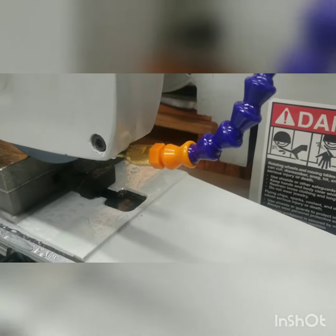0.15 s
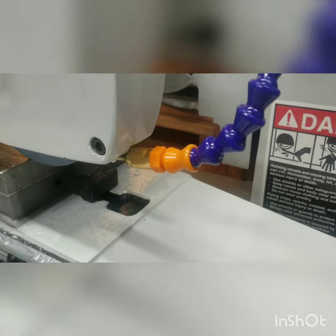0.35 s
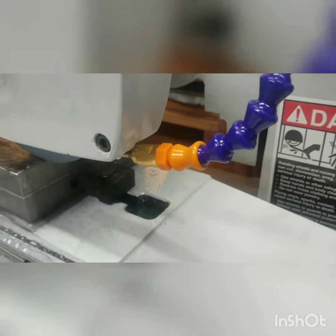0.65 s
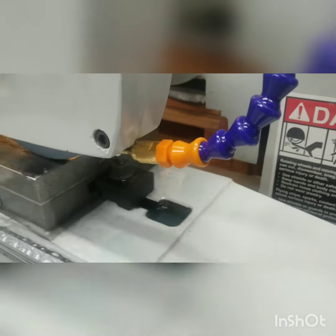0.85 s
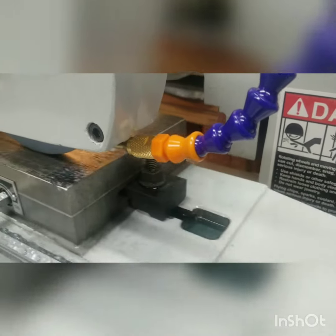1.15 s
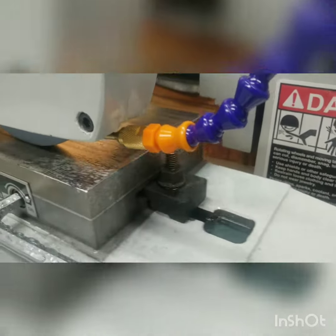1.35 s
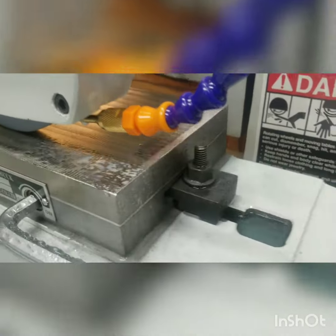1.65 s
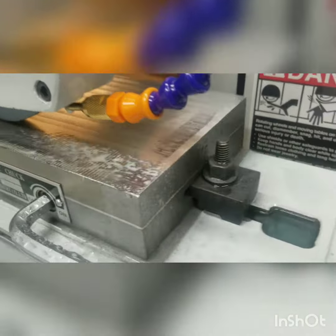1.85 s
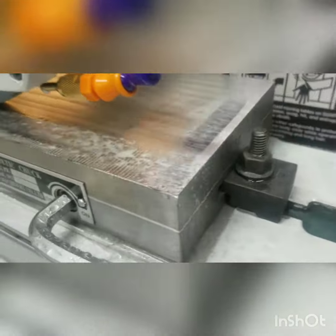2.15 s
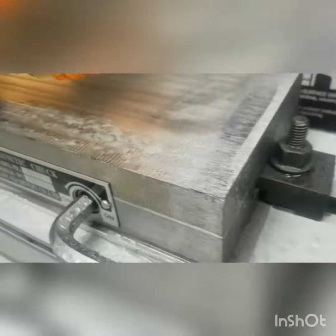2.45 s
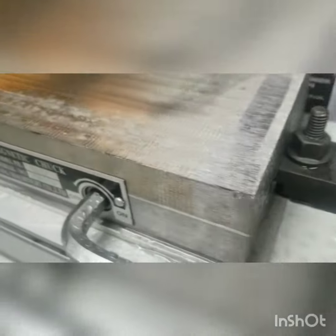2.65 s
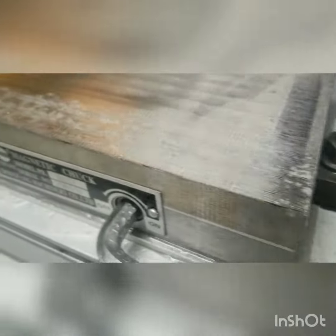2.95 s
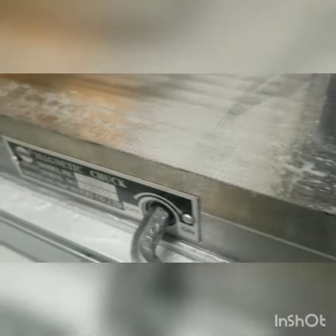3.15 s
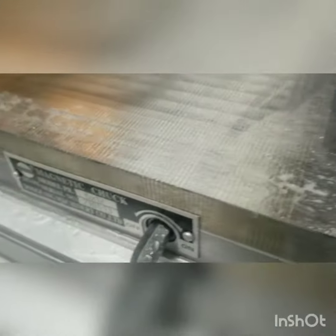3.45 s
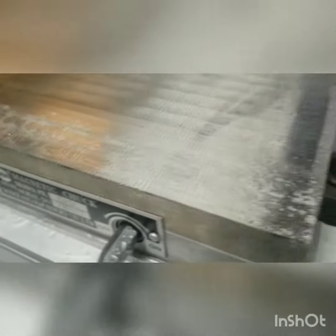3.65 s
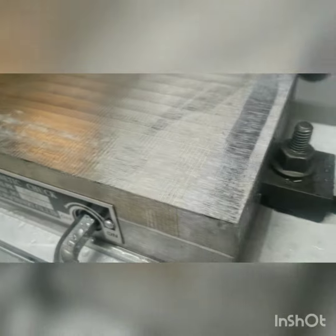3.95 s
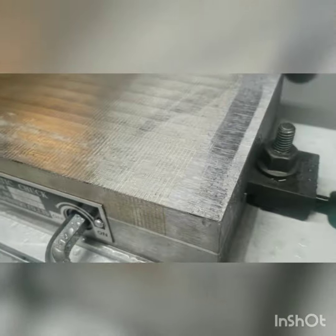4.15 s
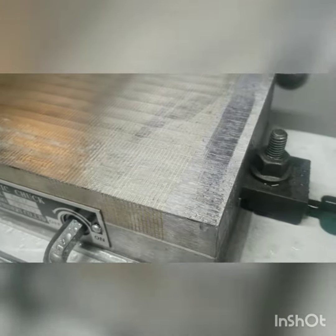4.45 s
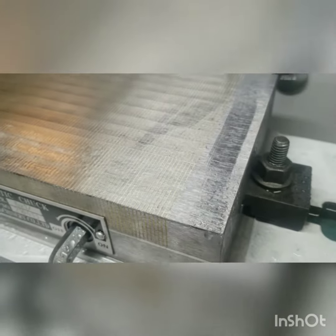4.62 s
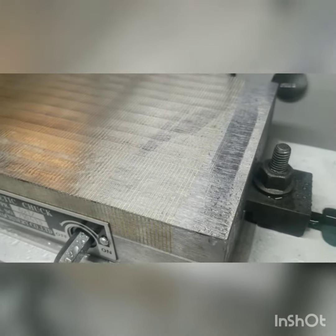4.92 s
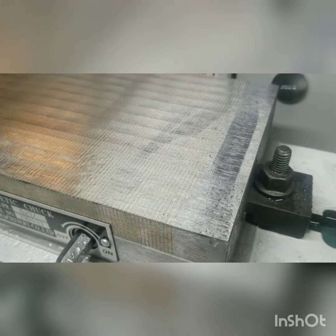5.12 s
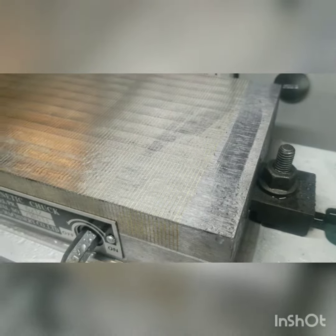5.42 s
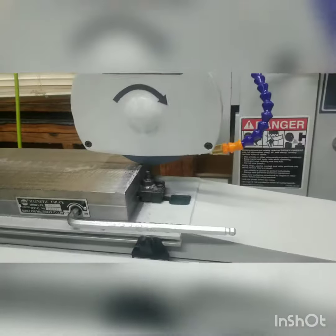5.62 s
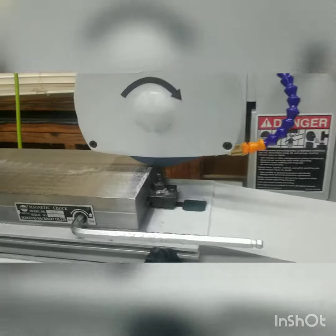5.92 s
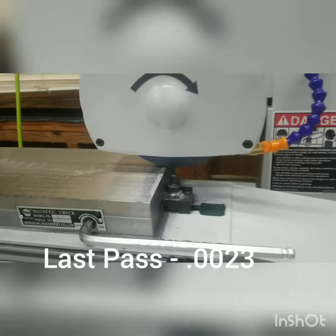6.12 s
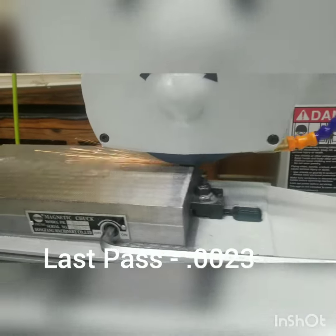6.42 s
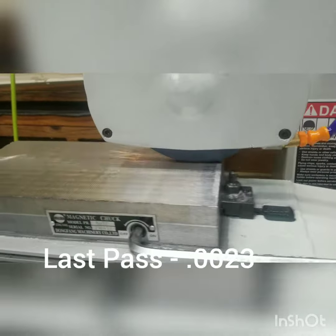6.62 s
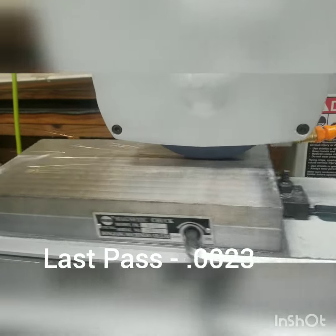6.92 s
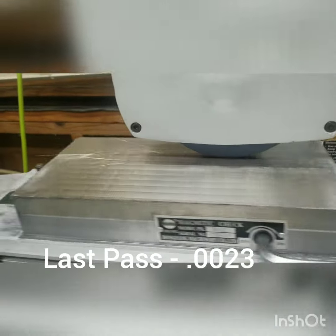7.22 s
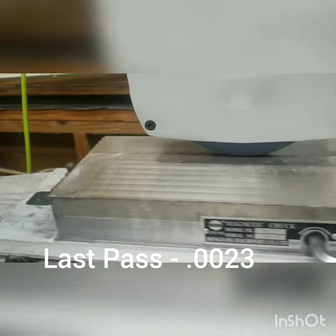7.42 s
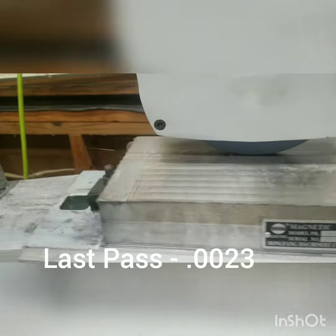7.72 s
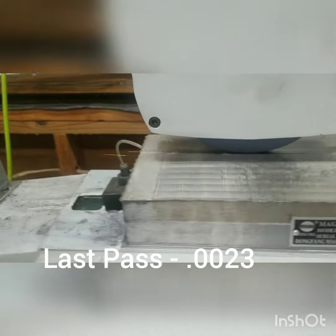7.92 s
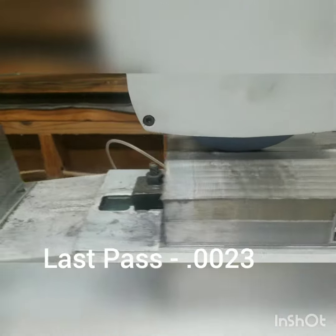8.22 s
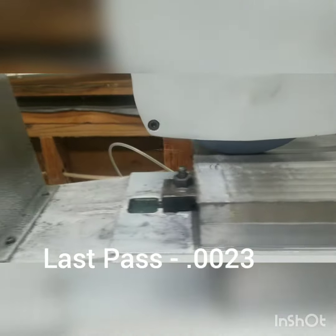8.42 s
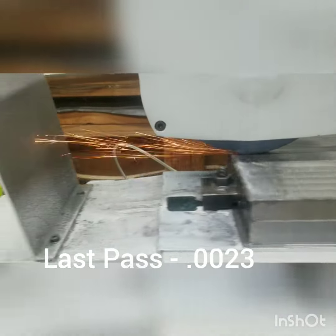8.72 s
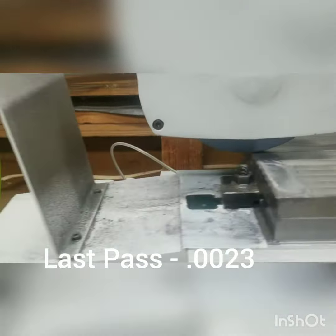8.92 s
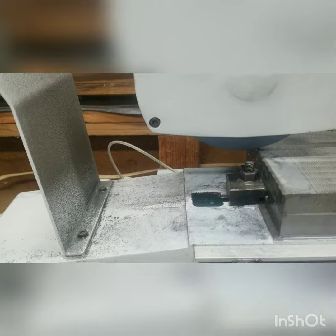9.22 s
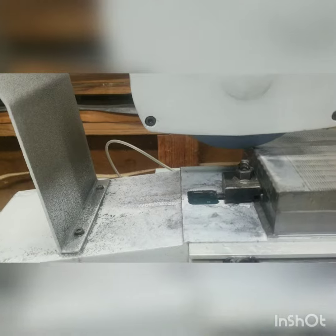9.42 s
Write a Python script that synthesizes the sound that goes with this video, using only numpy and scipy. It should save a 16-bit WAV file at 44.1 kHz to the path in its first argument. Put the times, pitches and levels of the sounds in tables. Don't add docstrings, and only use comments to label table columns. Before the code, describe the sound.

A surface grinder's spindle hums and sings while an air jet hisses loudly; the wheel grinds steel twice, separated by an abrupt cut and tiny gap.

```python
import sys
import numpy as np
from scipy import signal
from scipy.fft import rfft, irfft
from scipy.io import wavfile
from scipy.ndimage import uniform_filter1d

SR = 44100
rng = np.random.default_rng(int(sys.argv[2]) if len(sys.argv) > 2 else 0)


def nominal_scale(level):
    x = np.asarray(level, float) / 20
    return 10 ** x


def dump(signal):
    limited = np.clip(np.atleast_2d(signal).T, -1, 1)
    pcm = np.round(limited * 32767).astype(np.int16)
    wavfile.write(sys.argv[1], SR, pcm)


N = 422037
SCENE_CHANGE_S = 5.446
TOUCH_S = .14


def unit(x):
    return x / np.sqrt(np.mean(x ** 2) + 1e-20)


def seconds():
    return np.arange(N) / SR


def by_scene(t, first, second):
    return np.where(t < SCENE_CHANGE_S, first, second)


def along(points, hz):
    f, v = np.transpose(points)
    return np.interp(np.log(hz + 1), np.log(f + 1), v)


def curve(points, t):
    s, value = np.transpose(points)
    return np.interp(t, s, value)


def wobble(rate):
    knots = rng.standard_normal(int(N * rate / SR) + 4)
    return np.interp(np.arange(N) * rate / SR, np.arange(len(knots)), knots)


def window(t, start, end, edge):
    return np.clip(np.minimum(t - start, end - t) / edge + .5, 0, 1)


def spell(start, end, db):
    t = seconds()
    outside_s = np.maximum(0, np.maximum(start - t, t - end))
    return db - 250 * outside_s


# touch t/s, leave t/s, slip at touch, slip at leave (turns/s)
PASSES = [
    (.68, 3.11, .52, .44),
    (6.41, 8.84, .84, .41),
]


def spindle():
    t = seconds()
    idle_turns = 59.22
    passes = [window(t, touch, leave, TOUCH_S) for touch, leave, _, _ in PASSES]
    slip = sum(on * np.interp(t, row[:2], row[2:]) for on, row in zip(passes, PASSES))
    return np.cumsum(idle_turns - slip) / SR, passes


STAGE_START = [
    0,
    .68,
    1.9,
    3.15,
    5.48,
    6.38,
    7.2,
    8,
    8.75,
]
# hum level/dB, roar level/dB, fizz against jet level/dB, shaft level/dB, bearing level/dB
STAGE_LEVELS = [(-35.5, -31.5, -5.5, 0, 2), (-36.5, -30.5, -3, 0.5, 1), (-35.5, -32, -6, -2.5, -1),
                (-36.5, -32.5, -9, 0.5, -2.5), (-37, -31.5, -1.5, -2, -1.5), (-39, -31, -2, 0.5, -0.5),
                (-37, -32.5, -4.5, 1.5, 1.5), (-37, -32, -2, 2.5, 3.5), (-35, -32, -8.5, 2, 5)]


def stages():
    index = np.searchsorted(STAGE_START, seconds(), side='right') - 1
    return uniform_filter1d(np.transpose(STAGE_LEVELS)[:, index].astype(float), size=SR // 8, axis=1)


# t/s, delay of the jet at the left port (samples)
HAND_TURN = [(0, -9), (1, -8), (2.5, -15.5), (4, -17.7), (5.47, -17.3), (5.49, -8), (6.2, -8), (6.8, 2),
             (7.2, 5), (8.3, 5.5), (8.8, 8), (9.6, 7.5)]


def jet_lag(t):
    return curve(HAND_TURN, t)


def body_lag(t):
    return .4 * jet_lag(t) + by_scene(t, -7.5, 1.5)


def ports(hz, lag, delay=0):
    return np.exp(-2j * np.pi * hz / SR * (delay + np.array([lag / 2, -lag / 2])[:, None]))


def body_path(hz, t):
    return ports(hz, body_lag(t))


# f/Hz, level/dB
LEFT_PORT = [(100, -1), (350, 1.5), (4000, 2), (10000, -0.5), (14000, 5.5)]
# f/Hz, level/dB
TURNED_PORT = [(300, -1), (2000, -1), (5000, -1.5), (12000, -4)]


def rush(spectrum, paths, diffuse_db, streak_db, shaded=False):
    frame = dict(nperseg=512, noverlap=384)
    hz, t, z = signal.stft(rng.standard_normal((3, N)), SR, **frame)
    field = rng.standard_normal(z[1:].shape)
    field = uniform_filter1d(field, size=2, axis=1)
    field = uniform_filter1d(field, size=160, axis=2)
    direct = z[0] * paths(hz[:, None], t)
    room = nominal_scale(diffuse_db) * z[1:]
    if shaded:
        room = room * np.minimum(lift(hz[:, None], t), 1)
    both = (direct + room) * nominal_scale(streak_db * unit(field))
    left_db = along(LEFT_PORT, hz)[:, None] + np.outer(along(TURNED_PORT, hz), t > SCENE_CHANGE_S)
    both[0] *= nominal_scale(left_db)
    both = both * nominal_scale(along(spectrum, hz))[:, None]
    return unit(signal.istft(both, SR, **frame)[1][:, :N])


def tones(orders, turns, levels_db, blur):
    lag_turns = body_lag(seconds()) * 59 / SR
    out = np.zeros((2, N))
    for order, db in zip(orders, levels_db):
        phase = 2 * np.pi * (order * turns + rng.random() + blur * wobble(30))
        for side, sign in enumerate((-1, 1)):
            level = nominal_scale(db + 2.5 + 1.3 * wobble(1.493))
            out[side] += level * np.sin(phase + sign * np.pi * order * lag_turns)
    return out


# f/Hz, level/dB (per Hz)
GRIP = [(25, -16), (60, 2), (110, 7), (180, -16), (300, -80)]


def grip():
    return nominal_scale(-48) * window(seconds(), 5.5, 5.78, TOUCH_S) * rush(GRIP, body_path, -10, streak_db=0)


# f/Hz, level/dB (per Hz)
HUM = [(25, -70), (60, -17), (120, -12), (170, -15.5), (220, 13), (300, -8), (400, -1.5), (520, -3.5),
       (700, -4), (1000, -8.5), (2000, -76)]


def housing_hum(hum_db, runout):
    return nominal_scale(hum_db - 2.5 + 1.4 * runout) * rush(HUM, body_path, -10, streak_db=3.0)


def roar_paths(hz, t):
    return body_path(hz, t) + .8 * ports(hz, by_scene(t, 26, -32), 70)


# f/Hz, level/dB (per Hz)
ROAR = [(500, -31), (900, -14), (1400, -8), (1800, -14), (2100, -3.5), (2500, -12.5), (2900, -5.5),
        (3300, -17), (4500, -17)]


def machine_roar(roar_db, hand, runout):
    return nominal_scale(roar_db - 1.5 + 0.41 * hand + 0.89 * runout) * rush(ROAR, roar_paths, -1, streak_db=4.3)


# t/s, whine f/Hz
FEED = [(0, 0), (.2, 0), (.8, 4100), (3.04, 4100), (3.48, 0), (3.98, 2003), (5.47, 2003), (5.49, 1200),
        (5.85, 0), (5.95, 0), (6.55, 4100), (8.78, 4100), (9.21, 0), (9.33, 0), (9.6, 1560)]
# f/Hz, level/dB
WHINE = [(250, -60), (600, -54), (1000, -46), (1650, -41), (1870, -42), (2003, -49), (2600, -40),
         (3000, -52), (4100, -75)]
# f/Hz, width f/Hz, level/dB
CARRIAGE = [(590, 90, 10), (750, 50, 0), (900, 50, -4), (1100, 300, -12), (1650, 80, 5), (1860, 60, 1),
            (2003, 60, -1), (2140, 200, 3), (2480, 260, 1)]


def table_drive():
    t = seconds()
    hz = curve(FEED, t)
    steady = np.clip((t - 3.98) / .35, 0, 1) * (t < 5.47)
    db = along(WHINE, hz) + by_scene(t, 0, -2) + 6 * steady
    db = db + 17 * window(t, 5.55, 5.8, TOUCH_S)
    db = db + 9 * window(t, 9.48, 9.7, TOUCH_S)
    braking = uniform_filter1d(1. * (np.gradient(hz) < 0), size=SR // 50)
    db = db - 9 * braking
    db = db - 12 * np.exp(-((t - 4.82) / .11) ** 2)
    flutter_db = 3 * wobble(40)
    level = nominal_scale(db + 3 + flutter_db * (1 - .4 * steady))
    swell = nominal_scale(-20) + sum(nominal_scale(g) / np.hypot(1, ((hz - c) / (w / 2)) ** 2) for c, w, g in CARRIAGE)
    octave = nominal_scale(np.interp(steady, (0, 1), (-20, -6)))
    phase = 2 * np.pi * np.cumsum(hz) / SR
    whine = level * (swell * np.sin(phase) + octave * np.sin(2 * phase))
    tail = rng.standard_normal((2, SR // 4)) * nominal_scale(-60 * np.arange(SR // 4) / SR / .25)
    tail = tail / np.linalg.norm(tail[0])
    return whine + nominal_scale(-4) * signal.fftconvolve(whine[None], tail, axes=1)[:, :N]


# start t/s, end t/s, from f/Hz, to f/Hz, level/dB
SWEEPS = [(0.195, .65, 6250, 6200, 0.5), (0.252, .8, 8600, 7650, -11), (.3, .8, 4550, 4540, 7),
          (.75, 1.2, 4240, 5700, -11), (.85, 1.25, 4900, 4960, -6), (1.1, 1.5, 5400, 5200, 7),
          (1.195, 1.9, 7150, 7500, -15), (1.3, 1.7, 6800, 6700, 6), (1.5, 2.3, 8300, 8800, -8),
          (1.7, 2.045, 5360, 5300, 6.5), (2.202, 2.6, 5850, 5100, -13), (2.302, 2.75, 7300, 7600, -8),
          (2.6, 3.7, 4540, 4460, -2), (3.303, 3.7, 9100, 10100, -6), (3.4, 3.9, 7900, 7600, -11),
          (3.6, 4.3, 5500, 5500, -2), (3.85, 4.55, 8600, 8500, -3), (4.6, 5.45, 7700, 7740, -3),
          (6.447, 6.996, 4370, 4360, -16), (6.4, 7, 3250, 3220, -11), (6.7, 7.05, 8700, 8600, -8),
          (7, 8.7, 5600, 5700, -11), (8.7, 9.2, 3300, 3300, -18), (8.95, 9.7, 4250, 4200, 3),
          (9.15, 9.7, 5340, 5300, 3), (5.5, 6.3, 8200, 8150, 5), (8.65, 9.2, 8300, 7900, -8),
          (9.25, 9.7, 8700, 8700, 11), (3.7, 5.45, 4400, 4400, -2.5), (0, .25, 7700, 7700, 4),
          (6.5, 7.4, 8000, 8000, 9), (3.9, 4.15, 5600, 5600, -5), (4.3, 4.7, 4800, 4740, 2)]


def sweeps(hz, t):
    total = 0
    for start, end, low, high, db in SWEEPS:
        centre = np.interp(t, (start, end), (low, high))
        shape = np.exp(-2 * ((hz / centre - 1) / 0.059) ** 4)
        total = total + db * window(t, start, end, 0.24) * shape
    return total


# start t/s, end t/s, centre f/Hz, width f/Hz, level/dB
POCKET = [(0, 0.41, 7230, 900, 9.5), (.65, 1.12, 6780, 800, 11), (-.2, 0.69, 4790, 496, -11),
          (1.3, 2.4, 3880, 497, 2.5), (2.1, 3.72, 6240, 980, 3.5), (2.2, 3, 4900, 700, -2.5),
          (3.21, 5.54, 5270, 800, 4), (5.5, 5.72, 3670, 1180, 11), (7.45, 10.3, 13300, 1480, 0),
          (8.45, 8.9, 4390, 1290, 6.5)]
MIRRORS = [(-0.2, 0.4, 10720, 700, 6.0), (-0.2, 0.6, 13700, 700, -5.5), (-0.2, 0.8, 9380, 1100, -5.5),
           (-0.2, 0.8, 15440, 450, 5.5), (-0.2, 2.4, 11720, 300, -4.0), (-0.2, 3.0, 4520, 300, 2.5),
           (0.2, 1.0, 4980, 300, -5.0), (0.2, 1.0, 6180, 300, -4.5), (0.6, 2.8, 7000, 300, -5.5),
           (0.8, 2.4, 5650, 450, 6.5), (1.0, 3.0, 14320, 1100, -4.0), (1.2, 3.4, 9300, 1600, 3.5),
           (1.2, 3.8, 15480, 300, 6.0), (1.2, 4.4, 7680, 300, 5.5), (1.6, 2.2, 14100, 1600, 3.0),
           (2.2, 3.0, 3060, 450, -4.5), (2.4, 3.0, 14900, 1600, -3.5), (2.6, 3.6, 11050, 300, -8.5),
           (2.6, 4.2, 6000, 700, -3.5), (2.8, 4.4, 3780, 300, -6.0), (3.0, 5.4, 13000, 300, -4.5),
           (3.2, 3.8, 14200, 450, 7.0), (3.2, 5.6, 11720, 450, 4.0), (3.4, 5.6, 4520, 300, -3.0),
           (4.4, 5.4, 5300, 700, 3.0), (4.4, 5.6, 14580, 700, 6.5), (5.4, 6.6, 5580, 300, 5.5),
           (5.4, 7.4, 12550, 300, 6.0), (5.6, 6.4, 4080, 700, 4.5), (5.8, 8.2, 6100, 450, -3.0),
           (6.2, 9.2, 13380, 300, 6.0), (6.4, 9.2, 11500, 300, 4.0), (6.6, 8.2, 14880, 450, -5.5),
           (7.0, 7.8, 10820, 450, -7.0), (7.8, 9.8, 4410, 450, 4.0), (7.8, 9.8, 9140, 450, 6.5),
           (8.0, 8.6, 12100, 300, -8.0), (8.8, 9.2, 14500, 1600, 6.5)]
SHADOW = [(.25, 1, 8200, 900, -6), (1.45, 2.3, 8300, 800, -4), (3.35, 3.85, 7900, 800, -6),
          (3.85, 4.55, 8500, 900, -9), (4.55, 5.47, 8100, 800, -8), (8.6, 9.3, 8100, 1000, -5)]


def lift(hz, t):
    start, end, centre, width, db = np.transpose(POCKET + MIRRORS + SHADOW)
    shape = db * np.exp(-2 * ((hz - centre) / width) ** 4)
    return nominal_scale(shape @ window(t, start[:, None], end[:, None], 0.24) + sweeps(hz, t))


def jet_paths(hz, t):
    lag = jet_lag(t)
    turned_away = np.max(lag[t < SCENE_CHANGE_S]) - lag
    delay = by_scene(t, 40, 46) + by_scene(t, 1.35, 0) * turned_away
    echo = by_scene(t, .47, .36) * ports(hz, lag + 10, delay)
    return lift(hz, t) * (ports(hz, lag) + echo)


# t/s, length t/s, level/dB
BITES = [
    (0.753, 0.053, 1.5),
    (0.897, 0.05, 2),
    (1.106, 0.03, 0.5),
    (1.84, 0.023, 0.5),
    (6.507, 0.075, 6),
]


def bites():
    t = seconds()
    swell = sum(db * np.exp(-((t - s) / length) ** 2) for s, length, db in BITES)
    return swell + 1.0 * wobble(22)


# t/s, jet level/dB
NEAR = [(0, -24), (.5, -19.5), (1.4, -26), (1.9, -23), (2.75, -19.5), (3.3, -21.5), (3.9, -21.5),
        (5.47, -24), (5.49, -32), (6.3, -29), (6.75, -27.5), (7.3, -21), (7.7, -22), (8.3, -26.5),
        (9.6, -27.5)]


def nozzle_level():
    return curve(NEAR, seconds())


# f/Hz, level/dB (per Hz)
JET = [(2000, -31), (2950, -32), (3150, 0.5), (3700, 0.5), (4300, 2.5), (5000, 9), (5600, -3), (6300, 4.5),
       (6900, 0), (7400, -9.5), (8000, -27), (9000, -54)]


def air_jet(bite_db, hand, pulse_db):
    db = nozzle_level() - 0.84 + bite_db + 1.13 * hand + pulse_db
    return nominal_scale(db) * rush(JET, jet_paths, -6.5, streak_db=2.2, shaded=True)


# f/Hz, level/dB (per Hz)
FIZZ = [(7000, -13), (8000, -9), (8600, -3), (9500, 2), (11000, 6), (13000, 5), (15000, 6.5), (15900, -2.5)]


def grit_fizz(fizz_db, bite_db, hand, pulse_db):
    db = nozzle_level() + fizz_db + 0.22 + 0.76 * bite_db + 0.78 * hand + pulse_db
    return nominal_scale(db) * rush(FIZZ, jet_paths, -6, streak_db=3.2, shaded=True)


# shaft order, level/dB
UNEVEN = [(3, -24), (6, -24), (12, -3.5), (25, -5.5), (45, -4), (66, 6.5), (90, 5), (115, -4.5),
          (132, -8.5)]


def unevenness(turns, cut):
    order = np.arange(513)
    draw = rng.standard_normal((2, 4, len(order)))
    patterns = irfft((draw[0] + 1j * draw[1]) * nominal_scale(along(UNEVEN, order)))
    read = np.array([np.interp(turns % 1, np.arange(1024) / 1024, p, period=1) for p in patterns])
    drift = 2 * np.pi * 0.141 * seconds()
    pair = np.cos(drift) * read[:2] + np.sin(drift) * read[2:]
    return nominal_scale(-31.0 + 0.46 * cut) * unit(pair + 0.024 * pair[::-1])


# shaft order, start t/s, end t/s, level/dB
HOUSING = [
    (19.94, 3.3, 5.47, -41),
    (20.1, 5.5, 6.4, -55),
]


def housing_song(turns):
    levels = [spell(start, end, db) for _, start, end, db in HOUSING]
    return tones([row[0] for row in HOUSING], turns, levels, blur=0.2)


SHAFT_ORDERS = [1, 2, 6, 7, 7.27, 8, 9, 20, 20.1, 21, 22]
# idle level/dB, first pass level/dB, second pass level/dB
SHAFT = [(-63, -61.5, -75), (-63.5, -63, -71), (-45.5, -45.5, -47), (-38, -39, -37.5), (-44.5, -50, -45),
         (-73, -52, -48.5), (-73, -52, -44.5), (-48, -53, -49), (-56, -67, -67), (-53.5, -48, -52),
         (-78, -48, -51)]


def shaft(turns, passes, stage_db):
    state = np.array([1 - passes[0] - passes[1], *passes])
    return tones(SHAFT_ORDERS, turns, np.array(SHAFT) @ state + stage_db, blur=0.11)


# first scene level/dB, second scene level/dB
BEARING_IDLE = [(-48, -55), (-40, -53), (-40, -45.5), (-48, -49), (-48, -50), (-46.5, -75), (-60, -46.5),
                (-54, -48), (-58, -49), (-37.5, -49), (-34.5, -38), (-50.5, -37.0), (-41, -36), (-62, -50),
                (-65, -47), (-53, -43), (-35.5, -42.5)]
# first pass fresh level/dB, worn level/dB, second pass fresh level/dB, worn level/dB
BEARING_CUT = [(-61, -43, -45, -53), (-58, -63, -53, -50.5), (-50, -44, -54, -63), (-34.5, -41, -44.5, -52),
               (-49, -44, -41.5, -46), (-53, -56, -41, -53), (-60, -45, -43, -43), (-37, -64, -39.5, -37),
               (-51, -53.5, -40, -40), (-40.5, -35.5, -38.0, -46.5), (-36, -53, -36.5, -41.5),
               (-36.5, -42, -26.5, -32), (-51.5, -53, -52, -42), (-60, -41, -37, -50),
               (-35, -30.5, -28, -45), (-42, -41, -27.5, -45), (-34.5, -33, -37, -38)]


def bearing_levels(passes):
    t = seconds()
    touches = [row[0] for row in PASSES]
    worn = [np.clip((t - s - late) / .9 + .5, 0, 1) for s, late in zip(touches, (1.25, 1.4))]
    build_db = -1 * sum(on * np.clip(1 - (t - s) / .5, 0, 1) for on, s in zip(passes, touches))
    free = (1 - passes[0] - passes[1]) * np.array([t < SCENE_CHANGE_S, t >= SCENE_CHANGE_S])
    cutting = [share * on for on, w in zip(passes, worn) for share in (1 - w, w)]
    return np.array(BEARING_IDLE) @ free + np.array(BEARING_CUT) @ np.array(cutting) + build_db - 2.1


# bearing tone number, start t/s, end t/s, level/dB
SPOTS = [(5, 2.3, 3.6, 11), (5, 6.4, 8.7, -6), (5, 8.85, 9.7, 10), (7, 0, .65, 5), (7, .75, 1.45, -5),
         (7, 1.9, 3.1, -5), (7, 6.4, 7, -9), (7, 8.05, 8.7, -5), (7, 9.1, 9.7, 4), (9, 0, .6, -5),
         (9, .7, 1.05, 6), (9, 1.1, 1.85, -8), (9, 1.85, 2.25, 7), (9, 7.05, 7.4, 7), (9, 8.3, 8.75, 4),
         (10, 1.1, 1.85, -4), (10, 1.9, 2.6, 6), (10, 2.7, 3.05, -5), (10, 3.65, 4.1, -6),
         (10, 5.9, 6.3, -8), (10, 6.7, 7.05, 3), (10, 8.3, 8.75, 4), (11, 0, 1.05, 5), (11, 1.5, 2.65, 4),
         (11, 3.15, 5.47, -10), (11, 5.5, 6.75, -10), (11, 8.85, 9.7, 6), (14, 1.45, 1.85, 5),
         (14, 2.7, 3.05, -6), (14, 3.6, 5.47, -9), (14, 8.85, 9.7, -7), (15, 1.45, 2.2, 5),
         (15, 6.4, 6.75, -4), (16, 0, 1.45, -5), (16, 2.65, 3.05, -8), (16, 4.15, 5.05, 9),
         (16, 6.4, 7.6, -5)]


def spots():
    t = seconds()
    out = np.zeros((len(BEARING_ORDERS), N))
    for line, start, end, db in SPOTS:
        out[int(line)] += db * window(t, start, end, TOUCH_S)
    return out


BEARING_ORDERS = [(4, 0), (7, -1), (7, 1), (8, -1), (9, -1), (9, 0), (9, 1), (10, 0), (10, 1), (11, 0),
                  (12, 0), (13, 0), (13, 1), (14, -3), (14, -2), (14, -1), (14, 0)]


def bearing(turns, passes, stage_db):
    balls_per_turn = 4.872
    orders = [multiple * balls_per_turn + side for multiple, side in BEARING_ORDERS]
    return tones(orders, turns, bearing_levels(passes) + stage_db + spots(), blur=0.04)


# shaft order, start t/s, end t/s
SQUEALS = [(3.74, .12, .3), (3.74, .72, 1.8), (3.74, 1.8, 3), (3.74, 6.4, 7), (3.74, 7.7, 9.05),
           (110.3, 1.2, 2.4), (109.4, 2.4, 3.1), (111.2, 6.38, 7.1), (118.25, 6.7, 8.5), (163.4, 6.4, 7.05),
           (163.4, 7.4, 8), (222.8, 8.58, 8.85), (235.5, 6.6, 8.3), (234.7, 8.4, 8.85), (16, 1.1, 2.6),
           (36.98, 2.6, 3.1), (110.6, 7.1, 8.8), (163.4, 8.35, 8.85), (163.4, .8, 3), (223.5, 6.4, 6.7)]
SQUEAL_LEVELS = [-43, -42, -50, -47.5, -44.5, -34.5, -37, -38, -39.5, -37.5, -53, -32, -35, -37, -56, -39.5,
                 -42, -49, -45, -43]


def wheel(turns):
    levels = [spell(start, end, db) for (_, start, end), db in zip(SQUEALS, SQUEAL_LEVELS)]
    return tones([row[0] for row in SQUEALS], turns, levels, blur=0.09)


def scene():
    turns, passes = spindle()
    cut = passes[0] + passes[1]
    hum_db, roar_db, fizz_db, shaft_db, bearing_db = stages()
    hand = .9 * wobble(5) + .4 * wobble(12)
    bite_db = bites()
    runout = np.cos(2 * np.pi * turns)
    pulse_db = .35 * cut * runout
    background = grip() + housing_hum(hum_db, runout) + machine_roar(roar_db, hand, runout) + table_drive()
    air = air_jet(bite_db, hand, pulse_db) + grit_fizz(fizz_db, bite_db, hand, pulse_db)
    turning = unevenness(turns, cut) + housing_song(turns) + shaft(turns, passes, shaft_db)
    return background + air + turning + bearing(turns, passes, bearing_db) + wheel(turns)


def scene_change():
    t = seconds()
    rise = 1 - np.exp(-np.maximum(0, t - 5.5105) / .0012)
    stumble = 1 - .7 * np.exp(-((t - 5.5165) / .002) ** 2)
    return by_scene(t, 1, rise) * stumble


def roll_off(x):
    return signal.sosfilt(signal.butter(12, 16920, fs=SR, output="sos"), x)


def record(dry):
    top_hz = 15870
    spectrum = rfft(dry)
    spectrum[:, np.fft.rfftfreq(N, 1 / SR) > top_hz] = 0
    mix = irfft(spectrum, N) * scene_change()
    return roll_off(mix)


dry = scene()
out = record(dry)
dump(out)
```